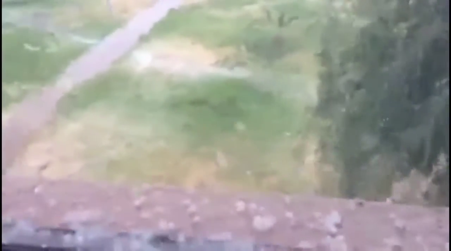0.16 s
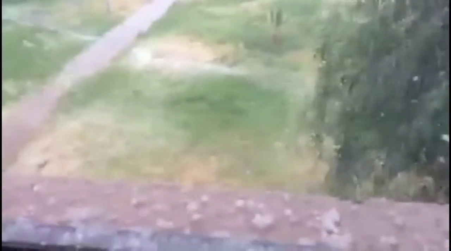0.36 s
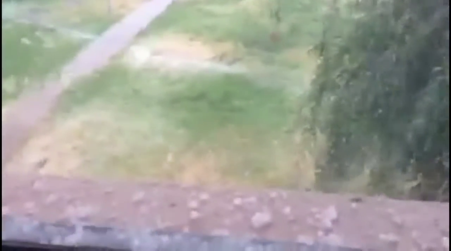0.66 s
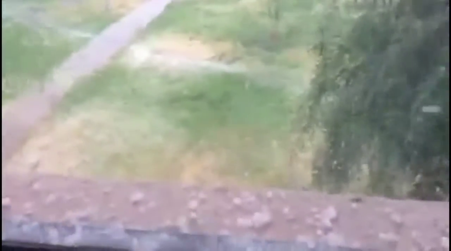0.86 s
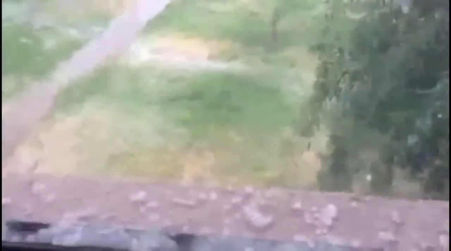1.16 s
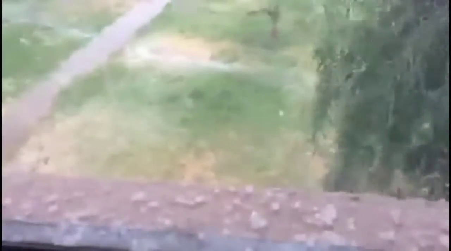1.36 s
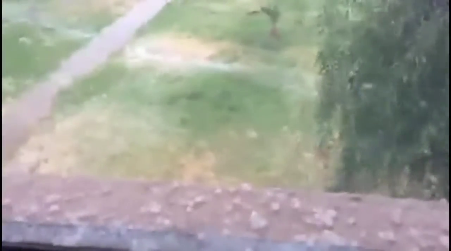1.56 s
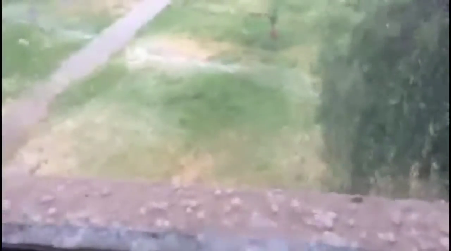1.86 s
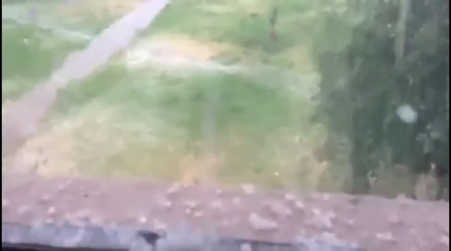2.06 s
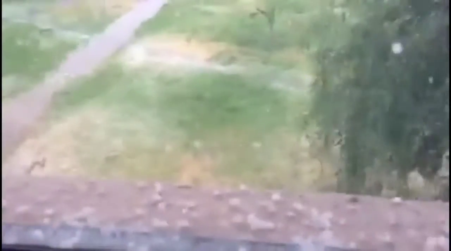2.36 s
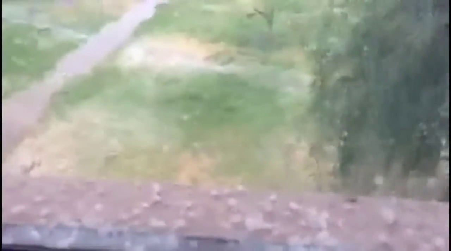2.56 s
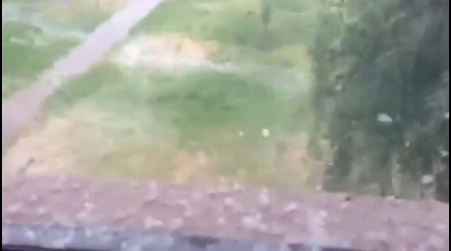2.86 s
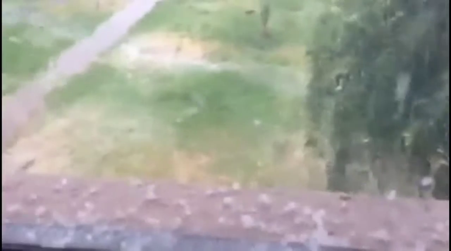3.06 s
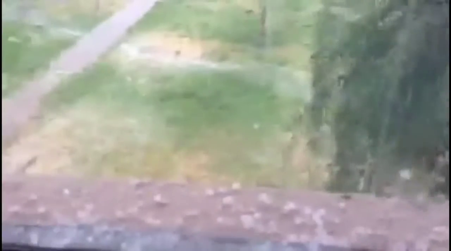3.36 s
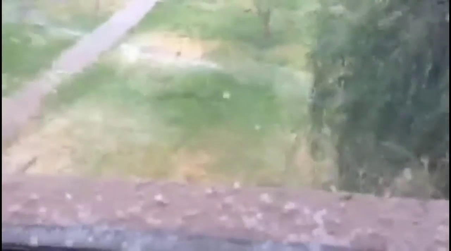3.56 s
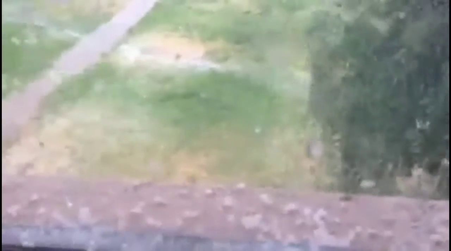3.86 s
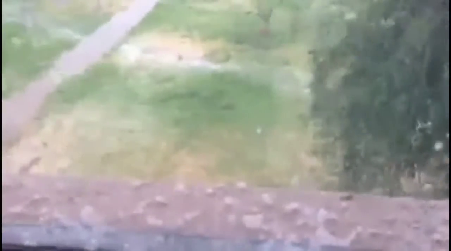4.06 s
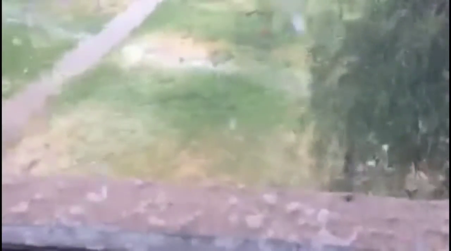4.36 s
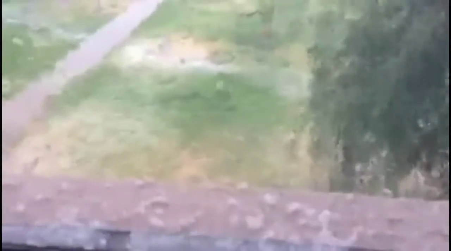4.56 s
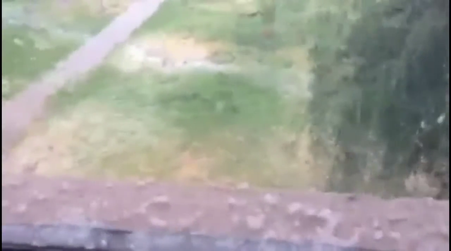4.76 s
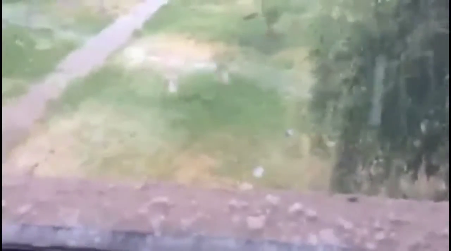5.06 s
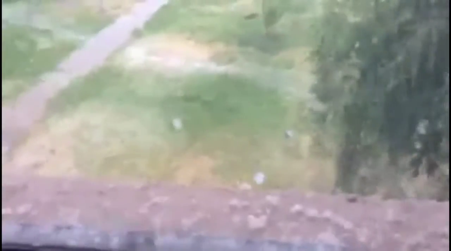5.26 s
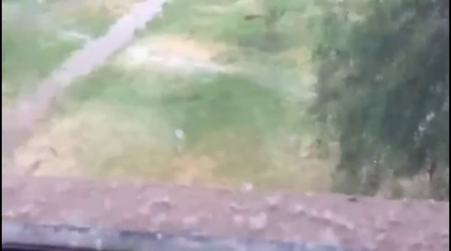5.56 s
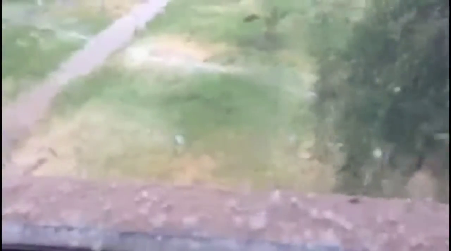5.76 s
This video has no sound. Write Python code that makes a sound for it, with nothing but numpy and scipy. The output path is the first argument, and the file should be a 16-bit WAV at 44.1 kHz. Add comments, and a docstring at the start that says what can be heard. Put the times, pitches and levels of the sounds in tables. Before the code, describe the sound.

A continuous hail shower heard from an open window above a garden. Large stones snap on the near ledge, many per second, each a very short, dry click with a quick knocking ring and a softer rebound. Small grains rattle irregularly around them, and low, hollow knocks come from the building. Constant rain stays quieter beneath. Close, slightly dulled phone sound, with little reverberation and no pause before the end.

```python
"""Hail and rain at an open window. From the first moment stones crack on the sill an arm's length away: each rings
its own mix of dense, quickly damped modes, then the window reveal and the room answer, and splinters and a hop follow.
Pellets patter and the building's sheeting drums throughout, over shaped-noise rain; heavy thuds join from 0.2 s.
The shower almost lets up near 0.3 s, is strongest near 3.6 s, and drops away again just before 4 s."""
import sys
import numpy as np
from scipy import signal
from scipy.fft import rfft, irfft
from scipy.io import wavfile
from scipy.ndimage import uniform_filter1d

SR = 44100
rng = np.random.default_rng(int(sys.argv[2]) if len(sys.argv) > 2 else 0)


def generate_wav(signal):
    """Clip the signal to [-1, 1] and save it as 16-bit WAV at the path in sys.argv[1]."""
    frames = np.transpose(np.atleast_2d(signal))
    scaled = np.clip(frames, -1, 1) * 32767
    pcm = np.round(scaled).astype(np.int16)
    wavfile.write(sys.argv[1], SR, pcm)


N = 260631
TIME = np.arange(N) / SR
TOP_HZ = 10400  # highest sill mode, and the edge of the phone's low-pass
RING_SIZE = 2304  # samples per sill ring

# The large stones that land on the sill. Each row: landing time in seconds, level over the first
# moments in dB, brightness in dB, body in dB.
STONES = [(0.0043, -29.5, -2, -3), (0.036, -27.5, 0, -9), (0.0567, -26.5, 1, 9), (0.0895, -25.5, -1, -2),
          (0.111, -41, 2, 20), (0.1788, -26.5, -1.5, -1), (0.2, -27.5, 1, -15.5), (0.2315, -29.5, -3, 4),
          (0.3054, -30.0, 3, 13), (0.3137, -27, -6, -1), (0.346, -24, -1.5, 4), (0.359, -26.5, -5.5, 14),
          (0.414, -31, 3.5, 5), (0.4568, -25, -3, -6), (0.526, -19.0, -3, 0), (0.5592, -33, 4, 5),
          (0.5733, -24.5, 5, 2), (0.5846, -31, 3, -1), (0.6163, -33.5, 4, 2), (0.6527, -22.5, 0.5, 7.5),
          (0.687, -23.0, 0, 5), (0.7466, -24.5, -6, -13), (0.787, -23.5, 0.5, 1), (0.8159, -19.5, -4, 0),
          (0.831, -27, 1.5, -9), (0.8584, -23, 1, -10), (0.8965, -31, 1.5, 10), (0.9364, -50, -5, 3),
          (0.9721, -18, 1.5, 4.5), (1.0163, -27.5, 2.5, 6), (1.0371, -28.0, -8, -8), (1.0578, -23.0, 1, -5),
          (1.128, -19.5, -5.5, -4), (1.176, -25.5, -9.5, 3), (1.1916, -24, 6, -6), (1.2065, -22, -0.5, 0),
          (1.222, -27.5, -11, -2.5), (1.2513, -21.5, 2.5, -1), (1.281, -16.0, 1, 1.5),
          (1.333, -35.5, -3, 5), (1.355, -27, -2.5, -7), (1.4439, -22, -7, -8), (1.4724, -31.5, -2, -1),
          (1.5224, -23, 3.5, 4), (1.5419, -25, -2, -7), (1.565, -24.5, -7.5, -6), (1.6162, -20, -1, 1.5),
          (1.6512, -21.5, -2, -1), (1.657, -23.5, 0.5, -20), (1.712, -34, 5, 7), (1.727, -31.5, 3, -3),
          (1.7543, -18, -1.5, -5.5), (1.7702, -18.5, -3.5, -8), (1.795, -24.0, 2, 8), (1.814, -26, 1, 3),
          (1.877, -26.5, 4, 14), (1.8905, -21.5, -3, -1.5), (1.9039, -26, -1, 9), (1.939, -28.5, 5, -1),
          (1.9516, -23.5, -9.5, -9), (2.0191, -33, -4.5, 8), (2.0888, -30.5, 1.5, 11),
          (2.13, -22.5, -14.5, -7), (2.16, -18.0, -9, 1), (2.1946, -22.5, 1.5, -4), (2.221, -23.5, -9, -2),
          (2.2863, -24, -3.5, 8), (2.3123, -22.5, -0.5, -2), (2.3269, -25.0, -4, 1), (2.352, -30.5, 1, -5),
          (2.383, -26.5, 1, 7.5), (2.41, -27.5, 6, 4), (2.4736, -22, 0, -6), (2.4867, -22.0, -0.5, -7),
          (2.5249, -26, -2, -1), (2.5558, -23.5, -0.5, -5), (2.5832, -18.5, 2.5, 4), (2.6019, -23, -7.5, 8),
          (2.6124, -19.5, 3, 7), (2.6608, -18.5, -2, -3), (2.6816, -20.5, -2, -0.5), (2.705, -32.5, 7, -5),
          (2.7345, -26.5, 1, -2), (2.7532, -25, 1.5, -4), (2.7786, -28, 4, -8), (2.81, -28, -2, -1),
          (2.8198, -18, -2, 8), (2.8554, -19.5, 0.5, -1), (2.9313, -26.5, 6, 6), (2.9412, -17.5, -3, -4.5),
          (2.9745, -33, -9, 21), (2.9855, -20.5, 0, 9.5), (3.0318, -17.0, -4.5, -9), (3.053, -22.5, 1, -2),
          (3.0946, -26.5, -6, 9.5), (3.133, -30, -2, -3), (3.163, -19.5, -2.5, -7),
          (3.1785, -24.5, -5.5, 5.5), (3.2174, -27, 2.5, -3), (3.2531, -19, -2.5, -4.5),
          (3.2633, -16.5, 2, 1.5), (3.3115, -28, 2.5, 3), (3.325, -29, 1, 3), (3.383, -25, -1, -6),
          (3.4053, -21.5, 3.5, 1), (3.425, -26.5, 1.5, -4), (3.4439, -30, -9.5, 2.5), (3.472, -15.5, 0, -2),
          (3.497, -23, -8, 3.5), (3.5117, -24.5, 1, 2), (3.531, -24, -1.5, 1), (3.563, -28, 5.5, 0),
          (3.5726, -16.5, 2.5, 6.5), (3.6012, -27.0, 3, -1), (3.652, -23, 2, 7), (3.664, -25, 0, 1),
          (3.695, -16.5, 0, -2), (3.7071, -18.5, -0.5, -7), (3.738, -27.5, 2.5, 20),
          (3.7766, -21.5, -0.5, -1), (3.8104, -21.5, -3.5, -6), (3.829, -27, -0.5, 2),
          (3.885, -28, -0.5, 7), (3.9496, -16, -2.5, -5.5), (4.0, -28, 8, 10), (4.032, -30.0, 1.5, 7),
          (4.0372, -26.5, 1.5, 0), (4.0715, -21, 2, -1), (4.0981, -17.5, -2, -4.5), (4.2071, -22.5, 4, 3),
          (4.2343, -26, -1, -3), (4.272, -19.5, -1, 0), (4.3004, -25.5, 2.5, 8), (4.3129, -21.5, 1.5, 6),
          (4.3749, -18, -7, -7), (4.3889, -34, 3, 1), (4.413, -22, 1, 2), (4.4462, -31.5, 5, 1),
          (4.471, -23.0, -2, 0), (4.5151, -28.5, -1, -1), (4.572, -28, 0, -2), (4.5858, -23, 0.5, 5.5),
          (4.6623, -23.5, 0.5, -3), (4.7118, -17, -3, -2.5), (4.7646, -25, 1, 4), (4.7809, -25.5, -4, -6),
          (4.8, -28.0, 1, -5), (4.8443, -19.5, -1, 9.5), (4.866, -33.5, 9, 1.5), (4.8979, -27, -4.5, -5),
          (4.9252, -21.0, 1.5, 5.5), (4.9359, -20, 1.5, 8.5), (4.9778, -17.5, -3.5, 3),
          (5.0514, -21.5, -3.5, -15), (5.095, -19.5, 0, 5), (5.1263, -16.5, -4.5, 0),
          (5.154, -16.5, 2.5, -2), (5.1963, -38, 7, 10), (5.221, -21.0, -0.5, -10), (5.2366, -23, -6.5, 7),
          (5.2507, -25, -0.5, -4), (5.2716, -32, -9, -1), (5.2908, -23, 3.5, 1), (5.4167, -31.5, -3, 10.5),
          (5.4389, -25.5, -2.5, -6), (5.467, -18, -1.5, -3.5), (5.5279, -20, -4.5, -2),
          (5.5446, -17, -0.5, 0), (5.606, -27.5, -21, 8), (5.619, -22.0, 3, 11.5), (5.6371, -21.5, -4, 1),
          (5.6557, -28, -8, 3), (5.6703, -20.0, -1.5, 11.5), (5.747, -31, -1, 13), (5.788, -19, -2, 0),
          (5.807, -20, -5.5, -11), (5.8337, -26, -0.5, -11), (5.8698, -22.5, -1, -2)]


def undb(db):
    """Decibels to gain."""
    return 10 ** (np.asarray(db) / 20)


def unit(x):
    """Scale to rms 1."""
    return x / np.sqrt(np.mean(x ** 2))


def along(hz, table):
    """Read a (Hz, value) table on a log-frequency axis."""
    f, value = np.transpose(table)
    return np.interp(np.log(np.maximum(hz, 1)), np.log(f), value)


def walk(rate):
    """Random wandering, spread near 1: straight lines between `rate` random points per second."""
    return np.interp(TIME * rate, np.arange(1024), rng.standard_normal(1024))


def place(times, sounds):
    """Lay short sounds on the time line."""
    out = np.zeros(N + sounds.shape[1])
    starts = np.clip(times * SR, 0, N - 1).astype(int)
    for start, sound in zip(starts, sounds):
        out[start:start + len(sound)] += sound
    return out[:N]


def sill_rings(bright_db, body_db, near_db):
    """One sum of damped sill modes per stone, at rms 1 over its onset; the spot it hits picks the mix."""
    spot_db = 3.0  # how strongly the spot colours the higher modes
    crack, crack_s = 0.32, 0.00022  # extra gain at contact, and its decay time
    echo_s, echo_spread, echo_gain = 0.0022, 0.35, 0.78  # typical lag, log spread, gain at near_db 0
    onset_s = 0.0077
    # Colour of a stone on the sill. Each row: frequency in Hz, relative level in dB.
    sill = [(60, -30), (130, -22), (200, -21.5), (420, -21.5), (700, -22), (1100, -15), (1600, -10.5),
            (2150, -7), (2800, -8), (4300, -5), (5500, -6), (7500, -7), (10300, -12)]
    # The sill's strongest resonances. Each row: frequency in Hz, width in Hz, lift in dB.
    sill_peaks = [(674, 130, 7.5), (2152, 160, 4), (2450, 370, 5), (3132, 217, 6.5), (3533, 264, 7),
                  (4190, 205, 7), (4825, 360, 4.5)]
    # How long the sill's modes ring. Each row: frequency in Hz, 60 dB decay time in seconds.
    sill_ring = [(200, 0.099), (900, 0.041), (2200, 0.04), (4000, 0.033), (9000, 0.022)]

    count = len(bright_db)
    t = np.arange(RING_SIZE) / SR
    hz = np.linspace(60, TOP_HZ, 500) + rng.uniform(-3, 3, 500)
    decay = np.log(1000) / along(hz, sill_ring)
    modes = np.exp(np.outer(2j * np.pi * hz - decay, t))
    db = along(hz, sill)
    for f, width, lift in sill_peaks:
        db = db + lift / (1 + (2 * (hz - f) / width) ** 2)

    # hard ice makes a brief, bright contact; a heavy stone moves the whole sill
    treble = along(hz, [(2000, -0.64), (4300, -0.031), (7000, 0.84)])
    bass = along(hz, [(1000, 0.94), (2400, 0)])
    # each spot favours some groups of neighbouring higher modes
    spots = rng.standard_normal((count, len(hz)))
    favoured = unit(uniform_filter1d(spots, size=24, axis=1, mode="wrap"))
    colour_db = np.outer(bright_db, treble) + np.outer(body_db, bass)
    weight = undb(db + colour_db + spot_db * favoured * (1 - bass))

    # the ice cracks in the first millisecond
    modes *= 1 + crack * np.exp(-t / crack_s)
    cosines, sines = modes.real.copy(), modes.imag.copy()

    # straight path, then off the window reveal and the pane: each direction carries its own mix
    rings, lags = np.zeros((count, RING_SIZE)), np.zeros(count, int)
    bounce = np.minimum(echo_gain * undb(-near_db), 1)[:, None]
    for share in (1, bounce, bounce ** 2):
        path = (weight * rng.standard_normal(weight.shape)) @ cosines
        path += (weight * rng.standard_normal(weight.shape)) @ sines
        delayed = [np.pad(ring, (lag, 0))[:RING_SIZE] for ring, lag in zip(path, lags)]
        rings += share * np.array(delayed)
        extra_s = echo_s * np.exp(echo_spread * rng.standard_normal(count))
        lags = lags + (SR * extra_s).astype(int)
    return rings / np.sqrt(np.mean(rings[:, t < onset_s] ** 2, axis=1, keepdims=True))


def hailstones():
    """Large stones excite the sill's modes; two softer splinters of each come down moments later."""
    near_slope = 0.38  # dB of nearness per dB of level
    splinter_db, scatter_db = -17, 5.0  # level relative to the stone, and its random spread
    splinter_s, flight_spread = 0.013, 0.4  # typical flight, log spread
    s, db, bright_db, body_db = np.transpose(STONES)
    # the loudest land nearest, so their straight path stands above the reflections
    rings = sill_rings(bright_db, body_db - 3.0, near_slope * (db - db.mean()))
    out = place(s, rings * undb(db)[:, None])
    for _ in range(2):
        flight, size, hardness = rng.standard_normal((len(s), 3)).T
        # the second splinter's flight is counted from the first one's landing
        s = s + splinter_s * np.exp(flight_spread * flight)
        rings = sill_rings(bright_db - 6.0 + 3 * hardness, body_db + 4.5, hardness)
        out += place(s, rings * undb(db + splinter_db + scatter_db * size)[:, None])
    return out


def bounces():
    """Each large stone hops and strikes the sill's modes once more, usually softer."""
    flight_s, flight_spread = 0.024, 0.33  # typical hop, log spread
    loss_db, scatter_db = -12, 4.5  # typical loss at the second landing, random spread
    size_share = 0.47  # dB of bounce per dB of first landing
    s, db, bright_db, _ = np.transpose(STONES)
    flight, size, hardness = np.clip(rng.standard_normal((len(s), 3)), -2, 2).T
    rings = sill_rings(bright_db + 2 * hardness, np.full(len(s), 3), hardness)
    bounce_db = db.mean() + size_share * (db - db.mean()) + loss_db + scatter_db * size
    landing_s = s + flight_s * np.exp(flight_spread * flight)
    return place(landing_s, rings * undb(bounce_db)[:, None])


def pellets(shower_db):
    """Small grains ring the sill at random between the stones, louder as the shower swells."""
    count = 800
    size_db, hardness_db, weight_db = 7.5, 5, 4  # random spread of level, brightness and body
    when = rng.uniform(0, N / SR, count)
    size, hardness, weight = np.clip(rng.standard_normal((count, 3)), -2, 2).T
    # louder grains have weaker reflections
    rings = sill_rings(-2 + hardness_db * hardness, 4 + weight_db * weight, 2 * size)
    patter = place(when, rings * undb(size_db * size)[:, None])
    return unit(patter) * undb(shower_db - 7)


def building(shower_db):
    """Hollow sheeting modes ring under drumming stones, blows passed on from the sill, and heavy thuds."""
    drum_count, drum_db, size_db = 700, -49, 3.5  # drumming blows, base level, random spread
    drum_follow = 0.39  # dB of drumming per dB of shower
    knock_db = -19  # peak of a sill blow in the sheeting, relative to the stone's level
    # Hollow modes of the sheeting. Each row: frequency in Hz, relative level in dB, 60 dB decay in seconds.
    panel = [(130, -9, .07), (155.6, -3, 0.092), (193.4, 1.5, 0.13), (232, -3, 0.095), (294, 0, 0.058),
             (321, -3, 0.039), (414, -10, 0.036), (519, 0, 0.027), (708, -1.5, 0.025), (870, -24, 0.024),
             (1052, -8.5, 0.034)]
    # Heavy stones on the building. Each row: time in seconds, peak in dB ahead of the bass cut.
    thuds = [(0.227, -31.5), (0.64, -30.5), (0.813, -23.5), (0.968, -26.5), (1.057, -34), (1.281, -30.5),
             (1.315, -23.5), (1.751, -37), (1.874, -31), (2.381, -23), (2.581, -28.5), (2.817, -38),
             (2.952, -34), (3.251, -36), (3.557, -40), (3.638, -30), (3.703, -36), (4.006, -35),
             (4.469, -40), (4.583, -37), (4.711, -42), (4.932, -27), (4.977, -33), (5.098, -43),
             (5.464, -37)]

    t = np.arange(4 * RING_SIZE) / SR
    modes = np.array([undb(db) * np.sin(2 * np.pi * hz * t) * 1000 ** (-t / t60) for hz, db, t60 in panel])

    def strike(s, peak_db):
        """Each blow rings its own mix of the sheeting's modes."""
        rings = rng.standard_normal((len(s), len(panel))) @ modes
        peaks = np.abs(rings).max(axis=1, keepdims=True)
        return place(s, rings * undb(peak_db)[:, None] / peaks)

    thud_s, heavy_db = np.transpose(thuds)
    stone_s, stone_db, *_ = np.transpose(STONES)
    drum_sizes = size_db * np.clip(rng.standard_normal(drum_count), -2, 2)
    drumming = strike(rng.uniform(0, N / SR, drum_count), drum_sizes)
    drumming = unit(drumming) * undb(drum_db + drum_follow * (shower_db - shower_db.mean()))
    return drumming + strike(thud_s, heavy_db) + strike(stone_s, stone_db + knock_db)


def room(x):
    """The room behind the window returns a short, dull tail: convolution with decaying, low-passed noise."""
    wet_db = -19  # relative to the sound that enters
    t60, gap_s, dull_hz = 0.071, 0.00439, 2500  # decay in s, wait before the tail, low-pass
    t = np.arange(SR // 2) / SR
    tail = rng.standard_normal(len(t)) * 1000 ** (-t / t60) * (t > gap_s)
    tail = signal.sosfilt(signal.butter(1, dull_hz, fs=SR, output="sos"), tail)
    return undb(wet_db) * np.std(x) * unit(signal.fftconvolve(x, tail)[:N])


def rain(shower_db):
    """Countless far drops merge into a hiss of shaped noise that partly follows the shower."""
    level_db, shower_share = -49, 0.52  # base level, dB of rain per dB of shower
    swell_db, flicker_db = -1.15, 3.0  # slow and fast random level changes
    # Colour of rain over the garden. Each row: frequency in Hz, relative density in dB per Hz.
    rain_colour = [(25, 5.5), (90, 8), (180, 16), (420, 3.5), (700, 5.5), (950, 2), (1500, -1), (2300, 11),
                   (4000, -1), (6000, -16.5), (10300, -13)]
    hz = np.linspace(0, SR / 2, N // 2 + 1)
    hiss = irfft(rfft(rng.standard_normal(N)) * undb(along(hz, rain_colour)), N)
    surge_db = shower_share * (shower_db - shower_db.mean())
    return unit(hiss) * undb(level_db + surge_db + swell_db * walk(0.64) + flicker_db * walk(62))


def scene():
    """Near hail with its room sound, over the drumming and the rain."""
    # Strength of the shower, which drives pellets, drumming and rain. Each row: time in seconds, level in dB.
    shower = [(0.0, -34), (0.18, -37), (0.33, -50), (0.67, -34.5), (1.79, -37), (1.92, -31.5), (2.16, -39),
              (2.34, -30.5), (2.67, -28), (3.22, -39), (3.61, -23), (3.88, -47), (4.1, -36.5), (4.26, -31),
              (4.62, -33.5), (5.08, -27.5), (5.32, -31), (5.91, -32.5)]
    shower_db = np.interp(TIME, *np.transpose(shower))
    hail = hailstones() + bounces() + pellets(shower_db)
    struck = hail + room(hail) + building(shower_db)
    # the struck sounds carry almost no deep bass below about 160 Hz
    bass_cut = signal.butter(4, 162, "highpass", fs=SR, output="sos")
    struck = signal.sosfilt(bass_cut, struck)
    return (struck + rain(shower_db))[None]


def record(dry):
    """The phone cuts the top with a steep elliptic low-pass."""
    return signal.sosfilt(signal.ellip(10, .2, 70, TOP_HZ, fs=SR, output="sos"), dry)


dry = scene()
out = record(dry)
generate_wav(out)
```